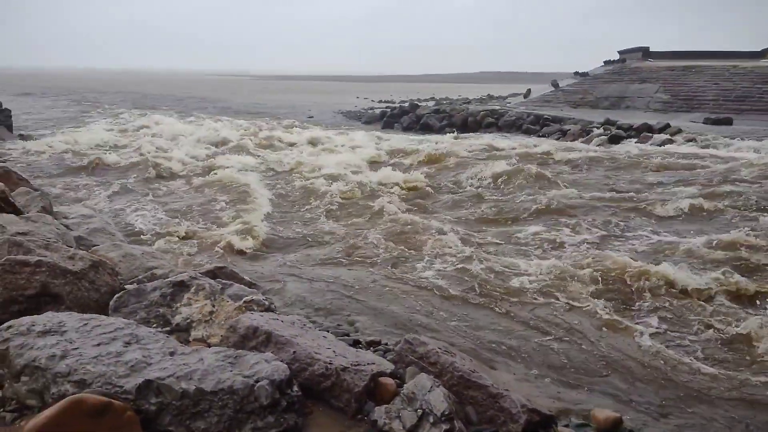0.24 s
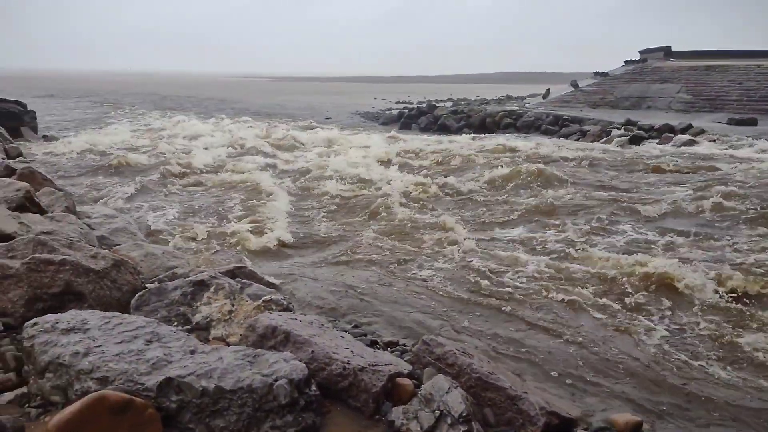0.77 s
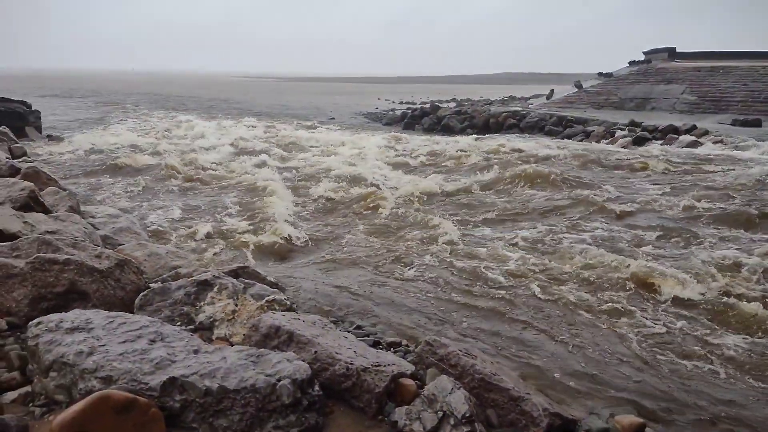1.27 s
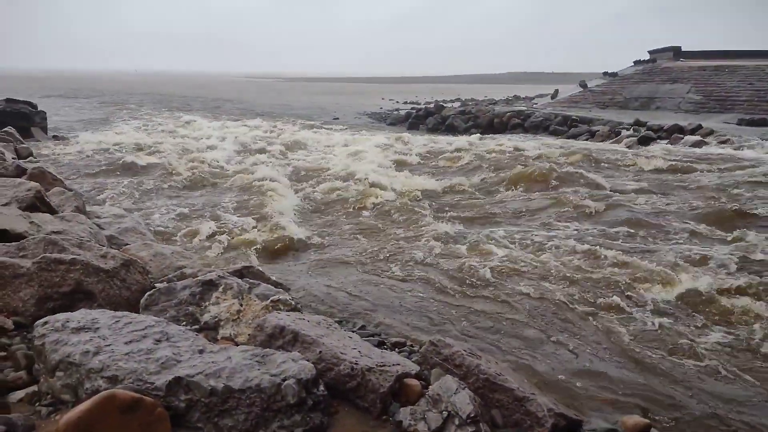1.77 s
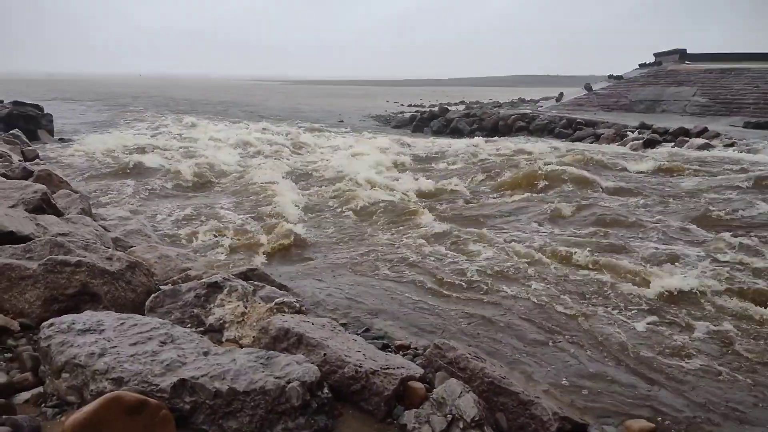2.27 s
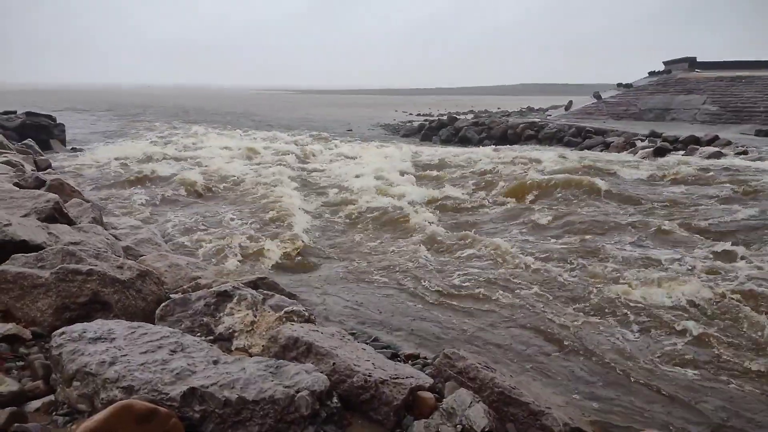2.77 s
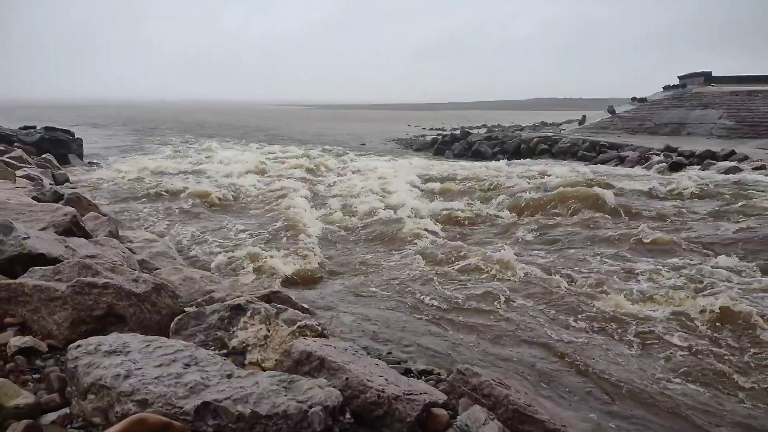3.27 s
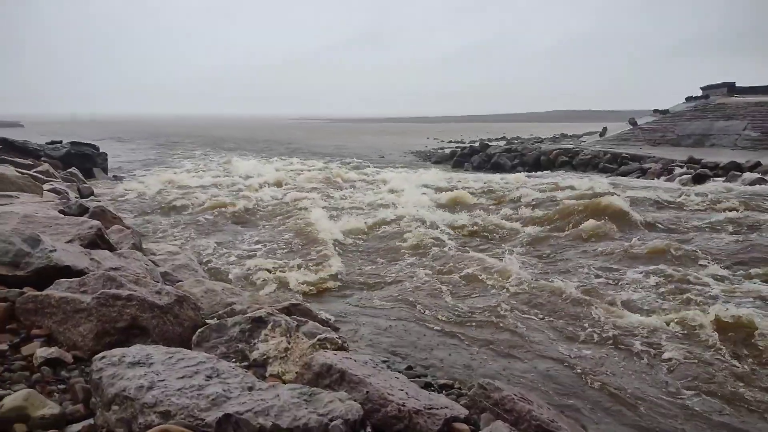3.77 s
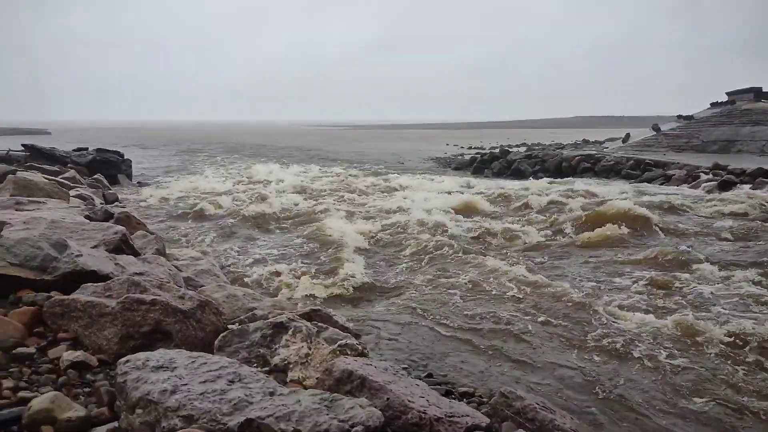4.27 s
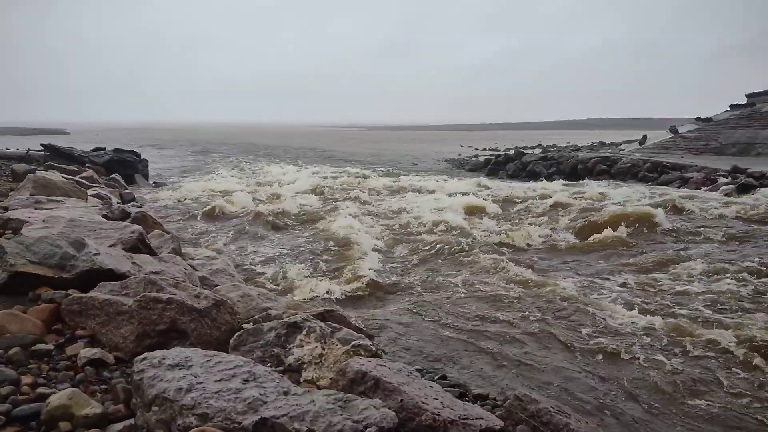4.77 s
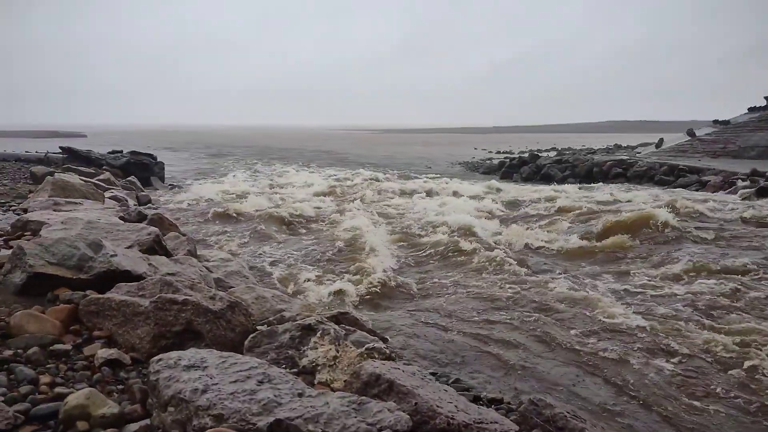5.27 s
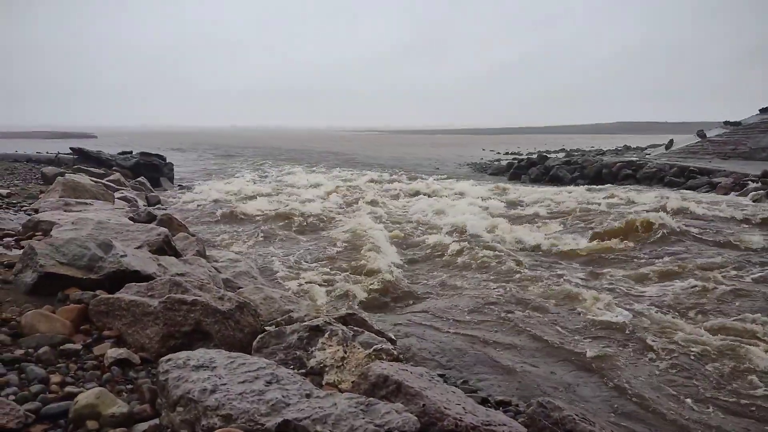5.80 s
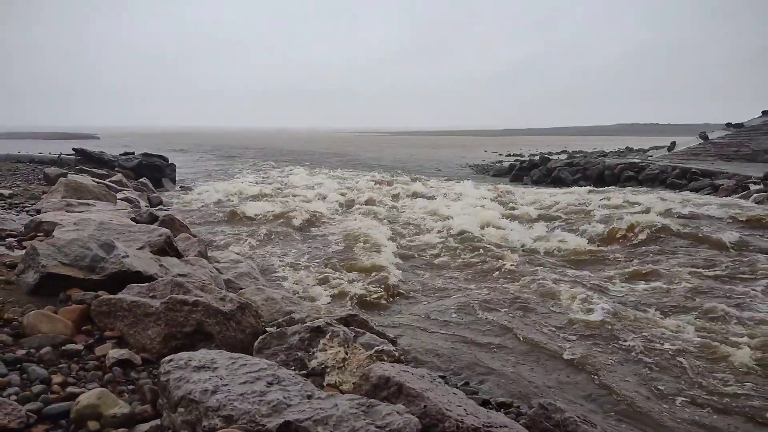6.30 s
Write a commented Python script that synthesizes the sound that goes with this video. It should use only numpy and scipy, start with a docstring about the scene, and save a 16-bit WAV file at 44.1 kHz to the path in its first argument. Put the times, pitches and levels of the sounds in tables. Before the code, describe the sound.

Outdoors, a swollen river roars continuously close by, but a hand over the microphones makes it dull, boxy and mostly left. Deep rumble heaves and thuds beneath bubbling churn, small low blips and faint dry ticks. Around 1.35 seconds a hard finger bump thumps on the right, and that side briefly ducks. Lighter bumps follow. In the last instant the hand slides off and bright, open water hiss comes through.

```python
"""A flooded river churns over rocks, heard by a hand-held camera whose two ports are covered by the hand. From
the start, filtered noise and ringing bubbles make a muffled, boxy roar, mostly on the left; faint ticks flicker
in the treble above it. Enveloped sines thud and blip in it, noise bursts splash; fingers bump the right port as
decaying sines. The hardest bump, early on, overloads that side's limiter, which ducks it. At the very end the
hand slides away and the full hiss of the white water comes through."""
import sys
import numpy as np
from scipy import signal
from scipy.fft import rfft, irfft, next_fast_len
from scipy.io import wavfile
from scipy.ndimage import uniform_filter1d, minimum_filter1d, map_coordinates

SR = 44100
rng = np.random.default_rng(int(sys.argv[2]) if len(sys.argv) > 2 else 0)


def pcm_store(signal):
    """Save signal as 16-bit PCM."""
    levels = np.round(np.clip(np.atleast_2d(signal), -1, 1) * 32767)
    wavfile.write(sys.argv[1], SR, levels.astype(np.int16).T)


N = 288414

# Source levels below are gains ahead of the river's common gain and the port filters.

# Likeness of left and right: f/Hz, correlation (-1 to 1)
CORRELATION = [(20, 0.26), (55, 0.96), (170, 0.84), (340, -0.68), (560, 0.55), (800, -0.065)]
# Weight of the deep current: t/s, rumble level/dB
CURRENT = [(0, -1), (0.25, -1.5), (0.41, -6), (0.65, -0.8), (1.55, -2.6), (2.7, 0.5), (3.15, -1),
           (3.85, -3), (4.3, -0.5), (5.2, 1.5), (6.4, -0.5)]
# Big air pockets dragged under: t/s, churn level/dB
CHURN = [(0, -1), (0.55, -0.5), (0.9, -1.2), (1.26, 0.5), (1.36, -4.5), (1.5, 0.5), (1.7, 1.1), (1.9, 0.6),
         (2.15, 0), (2.7, -0.5), (3.0, 0.7), (3.25, -1.1), (3.55, 0), (3.75, -1.1), (3.95, -1.4),
         (4.25, -0.8), (5.35, -1.2), (6.4, 0)]
# Slight level drift of the middle band, 750 to 2800 Hz: t/s, level/dB
MIDDLE_DRIFT = [(0, -1.2), (0.75, -0.4), (1.25, 0.3), (1.5, -0.7), (2, 0.15), (3.03, -0.8), (3.18, -1.8),
                (3.4, 1), (3.77, -1.3), (4.05, -0.6), (4.3, -1), (5.2, 0.5), (5.8, 0.5), (6.2, 0.5)]
FOAM_DB = -1  # tiny bubbles

# Port responses under the hand and in the open: f/Hz, gain/dB
LEFT_COVERED = [(15, -61), (48, -45.5), (115, -53.5), (260, -51), (620, -57.5), (900, -62.5), (1600, -65),
                (2300, -73.5), (3100, -85.5), (3800, -74), (4700, -73.5), (5150, -81.5), (5450, -82.5),
                (5720, -93.5), (5980, -113), (6600, -140)]
RIGHT_COVERED = [(15, -57.5), (48, -50), (100, -60), (165, -57.5), (235, -63), (380, -65.5), (560, -73.5),
                 (780, -72), (950, -78.5), (1170, -73.5), (1480, -93), (1800, -96.5), (3000, -95.5),
                 (4700, -94), (5650, -108), (6200, -140)]
LEFT_OPEN = [(45, -77), (130, -54.5), (260, -51), (520, -56), (1350, -60.5), (1750, -57.5), (2350, -56),
             (3000, -65), (3800, -69.5), (5100, -60.5), (6100, -69), (7600, -70.5), (8500, -77),
             (9800, -80), (10900, -78), (11550, -91), (12100, -87), (12700, -92), (13300, -85),
             (14700, -77.5), (15400, -82), (15800, -105)]
RIGHT_OPEN = [(45, -77), (160, -53.5), (400, -60.5), (680, -64), (950, -68.5), (1220, -70.5), (2100, -77),
              (4900, -80.5), (6100, -104), (9300, -99), (15000, -101), (15600, -130)]
# Resonances of the air between hand and left port:
# f/Hz with a tight grip, Gaussian half-width/Hz, tight-grip boost/dB, loose-grip boost/dB
POCKET = [(423.6, 56.4, 3, 6.5), (576, 93, 6, 7.5), (1261, 171, 7, 5.5), (1856, 190, 4, 3),
          (2662, 140, 6, 6.5)]
LOOSE_SHIFT = 1.008  # a loose grip raises the resonances by this factor
# Easing of the grip: t/s, looseness (0-1)
GRIP = [(0, 0.01), (4.1, 0.32), (5, 0.9), (6.4, 0.98)]
LEAK_DB, LEAK_HZ = 1.46, 3400  # extra treble let in by a loose grip, and its edge
CRACK_S, CRACK_DB = 6.439, -19  # a chink opens first and lets in this much open sound
UNCOVER_S = 6.455  # the hand leaves the ports
SLIDE_S = 0.002  # time constant of each opening step

# Response shaping the ticks: f/Hz, gain/dB
TICK_RESPONSE = [(4700, -130), (5600, -100), (6100, -105), (7600, -126), (15000, -133)]
# The clearest ticks: t/s, relative level/dB
CLEAR_TICKS = [(1.834, 24.5), (2.281, 28.5), (2.857, 30.5), (2.921, 30.5), (3.113, 27), (3.178, 23),
               (3.369, 27.5), (3.613, 29.5), (4.137, 32), (4.426, 28), (4.777, 27), (5.15, 29),
               (5.278, 27.5), (5.544, 29), (5.673, 26.5), (6.184, 34)]
# Collapse of the heaviest standing waves: t/s, level/dB, f/Hz
SURGES = [(0.197, -20.5, 52), (2.013, -17.5, 61.8), (2.732, -18.5, 52.8), (2.851, -15.5, 46),
          (3.29, -21, 56.1), (3.59, -19, 60), (4.03, -21, 55), (4.3, -17.5, 55), (5.046, -19.5, 48),
          (5.241, -21.5, 56.8), (5.471, -21.5, 47.3), (5.65, -22, 59), (6.428, -17.5, 60.5)]
SURGE_S = 0.024  # Gaussian half-width of each thud
# Brief low tonal blips in the roar: t/s, level/dB, starting f/Hz
BLIPS = [(0.694, -6, 555), (1.245, -13, 500), (1.698, -16.5, 191.7), (2.102, -15, 186), (2.234, -8.5, 532),
         (2.98, -17, 210), (3.174, -12, 513), (3.263, -15, 283), (3.861, -12, 254), (4.045, -8.5, 540),
         (4.403, -10, 610), (4.949, -18, 172.4), (5.154, -14, 450)]
BLIP_CYCLES, BLIP_RISE_PER_S = 2, 2.3  # starting-pitch cycles to the peak; share of f gained per second
# Crests slapping near the rocks: t/s, level/dB, length/s (twice the rise), f/Hz, Gaussian half-width/Hz
SPLASHES = [(0.878, 11.5, 0.0049, 3700, 700), (1.381, 8, .005, 1950, 350), (1.765, 10, .003, 1910, 420),
            (2.563, 7.2, 0.0053, 4850, 850), (2.593, 5, .004, 4100, 550), (2.818, 4.5, .02, 4400, 1000),
            (2.831, 17, .005, 5470, 380), (3.595, 5, 0.0055, 4680, 650), (5.092, 8, .004, 4200, 650),
            (5.552, 10, .0035, 5100, 1200), (5.672, 7.5, 0.0054, 2100, 550), (6.256, 4.5, .01, 3500, 1400),
            (6.457, -4, 0.0073, 4500, 3500)]
# Fingers on the right port, ahead of the limiter: t/s, envelope peak level/dB, f/Hz, rise/s, skin rub level/dB
BUMPS = [(1.3506, 7, 270, 0.0023, -20), (2.628, -15, 170, 0.0088, -42), (3.574, -26, 131, 0.0076, -34),
         (3.99, -17, 223, 0.0018, -33), (4.427, -14, 450, .0018, -16), (5.637, -19, 133, 0.0025, -40)]

TOP_HZ = 15830  # upper band limit


def amp(db):
    """Logarithmic level: decibels to amplitude gain."""
    return 10 ** (np.asarray(db) / 20)


def unit(x):
    """Normalization: scales to rms 1."""
    return x / np.sqrt(np.mean(x ** 2) + 1e-20)


def along(points, hz):
    """Interpolation of (f/Hz, value) points on a logarithmic frequency axis."""
    f, v = np.transpose(points)
    return np.interp(np.log(hz + 1), np.log(f + 1), v)


def curves(rows):
    """Linear interpolation in time: one value per sample for each column after t/s."""
    s, *cols = np.transpose(rows)
    return [np.interp(np.arange(N) / SR, s, c) for c in cols]


def wobble(rate):
    """Slow random modulation: a spline through random knots, rate of them a second."""
    knots = rng.standard_normal(int(N * rate / SR) + 4)
    return map_coordinates(knots, [np.arange(N) * rate / SR])


def filtered(x, response):
    """Linear filtering: the spectrum is multiplied by a response of frequency."""
    m = next_fast_len(N + SR // 2)  # padding keeps tails from wrapping round
    return irfft(rfft(x, m) * response(np.fft.rfftfreq(m, 1 / SR)), m)[..., :N]


def below(hz, edge_hz, order=4):
    """Smooth low-pass law: the gain is one half at the edge."""
    return 1 / (1 + (hz / edge_hz) ** (2 * order))


def swell(t, rise, order=3):
    """Impulsive envelope: power-law growth against exponential decay, peaking at 1 after the rise time."""
    u = np.maximum(t, 0) / rise
    return (u * np.exp(1 - u)) ** order


def rush(patchy_db):
    """Superposition of countless far bubbles: noise, patchy in time and frequency where a crest breaks."""
    z = signal.stft(rng.standard_normal((2, N)), nperseg=512)[2]
    field = uniform_filter1d(rng.standard_normal(z.shape[1:]), size=6, axis=0)
    field = uniform_filter1d(field, size=10, axis=1)
    patchy = z * amp(patchy_db * unit(field))
    return unit(signal.istft(patchy, nperseg=512)[1][:, :N])


def bubbles(low_hz, high_hz, cycles, glide, spread_db, count):
    """Damped bubble resonance: near bubbles ring for a few cycles, rising in pitch as they near the surface."""
    when, size, loud, side = rng.random((count, 4)).T[:, :, None]
    hz = low_hz * (high_hz / low_hz) ** size
    step = np.arange(1024)
    age = step / SR * hz / cycles  # 1 once the given number of starting-pitch cycles has passed
    strength = amp(spread_db * np.minimum(-np.log(1 - loud), 4)) * hz  # small ones are brief but sharp
    phase = 2 * np.pi * cycles * age * (1 + glide * age)
    ring = strength * amp(-60 * age) * np.sin(phase)
    index = ((when * N).astype(int) + step).ravel()
    gains = np.cos(2 * np.pi * side), np.sin(2 * np.pi * side)
    return unit(np.array([np.bincount(index, (ring * gain).ravel(), N)[:N] for gain in gains]))


def correlated(water):
    """Interchannel coherence: mid and side shares set the likeness of the ports at each frequency."""
    def shares(hz):
        angle = np.arccos(np.clip(along(CORRELATION, hz), -1, 1)) / 2
        return np.array([np.cos(angle), np.sin(angle)])

    mid, side = filtered(water, shares)
    return np.array([mid + side, mid - side])


def river():
    """Band decomposition: rumble, churn, middle and foam bands fluctuate independently, joined by single events."""
    near = bubbles(low_hz=251.3, high_hz=5730, cycles=11, glide=0.1, spread_db=2.5, count=6000)
    water = correlated(rush(patchy_db=0.55) + amp(-16.5) * near)
    below_110, below_750, below_2800 = (filtered(water, lambda hz: below(hz, edge)) for edge in (110, 750, 2800))
    # the deep band's own fluctuations are evened out before it heaves with the current
    evenness = unit(np.sqrt(np.abs(uniform_filter1d(np.mean(below_110 ** 2, axis=0), size=SR // 7))))
    rumble = below_110 / evenness * amp(curves(CURRENT)[0] + 0.92 * wobble(11)) + surges()
    churn = (below_750 - below_110) * amp(curves(CHURN)[0] + 0.4 * wobble(18))
    middle = (below_2800 - below_750) * amp(curves(MIDDLE_DRIFT)[0] + 0.085 * wobble(17))
    foam = (water - below_2800) * amp(FOAM_DB + 0.15 * wobble(25))
    # the square root turns unit-rms white noise into 0 dB per Hz
    return amp(-1.0) * (rumble + churn + middle + foam + splashes() + blips()) * np.sqrt(SR / 2)


def covered(sound):
    """Cavity resonance and absorption: the hand muffles both ports and leaves a ringing pocket at the left."""
    loose = np.clip(curves(GRIP)[0], 0, 1)
    shift = np.array([[1], [LOOSE_SHIFT]])  # rows: tight, loose

    def pocket_db(hz):
        return sum(np.array(boosts)[:, None] * np.exp(-((hz - centre * shift) / width) ** 2)
                   for centre, width, *boosts in POCKET)

    tight, eased = filtered(sound[0], lambda hz: amp(along(LEFT_COVERED, hz) + pocket_db(hz)))
    eased = filtered(eased, lambda hz: amp(LEAK_DB * (1 - below(hz, LEAK_HZ))))
    left = (1 - loose) * tight + loose * eased
    right = filtered(sound[1], lambda hz: amp(along(RIGHT_COVERED, hz)))
    return np.array([left, right])


def ports(sound):
    """Time-varying transmission: the covered response yields to the open one in two steps as the hand slides off."""
    free = filtered(sound, lambda hz: amp([along(LEFT_OPEN, hz), along(RIGHT_OPEN, hz)]))

    def opens(s):
        return np.exp(np.minimum(np.arange(N) / SR - s, 0) / SLIDE_S)

    gap = np.maximum(amp(CRACK_DB) * opens(CRACK_S), opens(UNCOVER_S))
    return (1 - gap) * covered(sound) + gap * free


def ticks(lesser_db, spread_db, rise_s, right_db, count):
    """Stratified impulse noise: faint puffs, mostly left, a few clear ones in a loosely even patter."""
    place, weak = rng.random((count, 2)).T
    lesser_s = (np.arange(count) + place) / count * N / SR  # one at random in each equal slot
    lesser = np.column_stack([lesser_s, lesser_db - spread_db * weak])
    s, db = np.vstack([CLEAR_TICKS, lesser]).T[:, :, None]
    step = np.arange(512)
    puffs = amp(db) * swell(step / SR, rise_s, order=1) * rng.standard_normal((len(s), len(step)))
    index = ((s * SR).astype(int) + step).ravel()
    train = unit(np.bincount(index, puffs.ravel(), N)[:N])
    shaped = filtered(train, lambda hz: amp(along(TICK_RESPONSE, hz)))
    return amp([[0], [right_db]]) * shaped * np.sqrt(SR / 2)


def surges():
    """Gaussian wave packet: each collapsing wave is one deep thud of a few cycles at most."""
    t = np.arange(N) / SR
    return sum(amp(db) * np.exp(-((t - s) / SURGE_S) ** 2) * np.sin(2 * np.pi * hz * (t - s))
               for s, db, hz in SURGES)


def blips():
    """Frequency-swept tone burst: each blip is a short sine rising in pitch."""
    t = np.arange(N) / SR

    def tone(age, hz):
        phase = 2 * np.pi * hz * age * (1 + BLIP_RISE_PER_S * age / 2)
        return swell(age, BLIP_CYCLES / hz, order=1) * np.sin(phase)

    return sum(amp(db) * tone(t - s, hz) for s, db, hz in BLIPS)


def splashes():
    """Narrow-band noise bursts: each stands for a spray cloud of bubbles of like size."""
    t = np.arange(N) / SR

    def cloud(centre, width):
        return filtered(rng.standard_normal((2, N)), lambda hz: np.exp(-((hz - centre) / width) ** 2))

    return sum(amp(db) * swell(t - s, length / 2, order=1) * cloud(hz, width)
               for s, db, length, hz, width in SPLASHES)


def fingers():
    """Pressure pumping of trapped air: each bump is a brief sine with a little friction noise of skin."""
    out, t = np.zeros(N), np.arange(N) / SR
    noise = rng.standard_normal(N)
    rub = unit(filtered(noise, lambda hz: below(hz, 1450) + .03 * below(hz, 5800, order=8)))
    for s, db, hz, rise, rub_db in BUMPS:
        pump = np.sin(2 * np.pi * hz * (t - s))
        out += amp(db) * swell(t - s, rise, order=4) * (pump + amp(rub_db) * rub)
    return np.array([np.zeros(N), out])


def scene():
    """Linear superposition: the river through the ports, faint ticks and fingers on the right port."""
    patter = ticks(lesser_db=22, spread_db=9.5, rise_s=.0008, right_db=-19, count=130)
    return ports(river()) + patter + fingers()


def limiter(x, hold, release):
    """Peak limiting: each side turns down on overload, holds, then recovers (times in s)."""
    needed = 1 / np.maximum(np.abs(x), 1)
    held_for, eased_for = 2 * int(hold * SR / 2) + 1, 2 * int(release * SR / 2) + 1
    # the shifted origins make hold and release look back only
    held = minimum_filter1d(needed, held_for, axis=1, origin=held_for // 2)
    recovering = uniform_filter1d(held, eased_for, axis=1, origin=eased_for // 2)
    eased = np.minimum(held, recovering)
    # a short centred window rounds the steps and still covers each peak
    return x * uniform_filter1d(minimum_filter1d(eased, size=301, axis=1), size=301, axis=1)


def record(dry):
    """Band limitation: the camera limits each channel's peaks and keeps nothing above its top frequency."""
    return filtered(limiter(dry, hold=.41, release=0.039), lambda hz: hz < TOP_HZ)


dry = scene()
out = record(dry)
pcm_store(out)
```